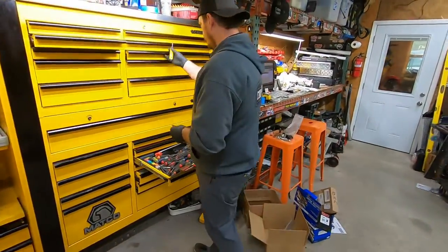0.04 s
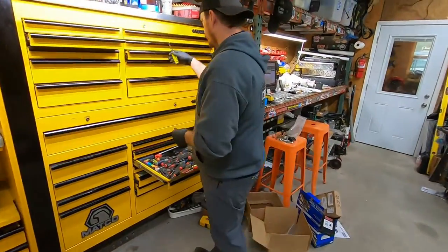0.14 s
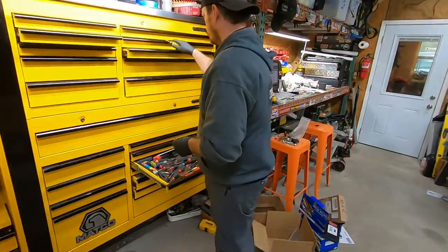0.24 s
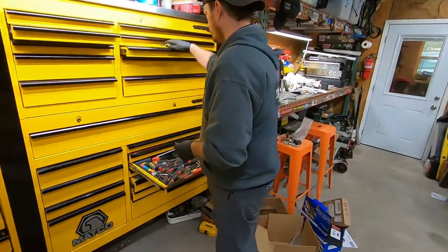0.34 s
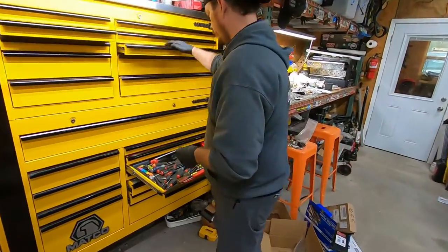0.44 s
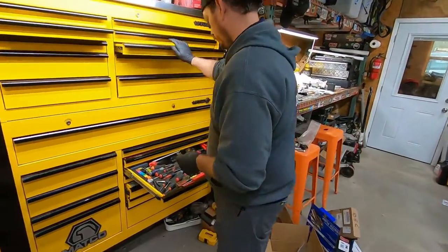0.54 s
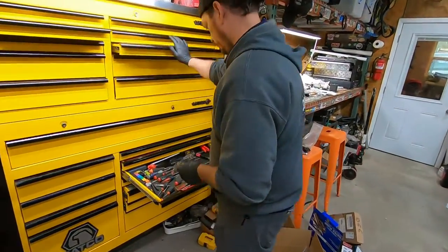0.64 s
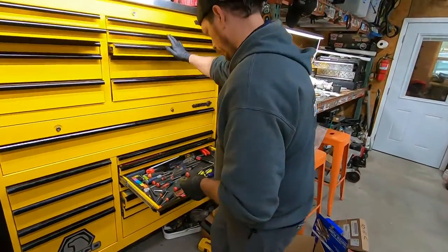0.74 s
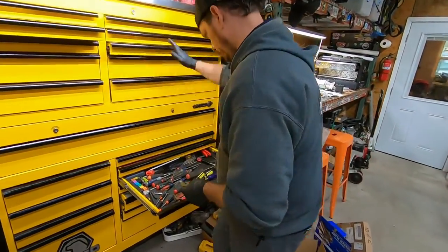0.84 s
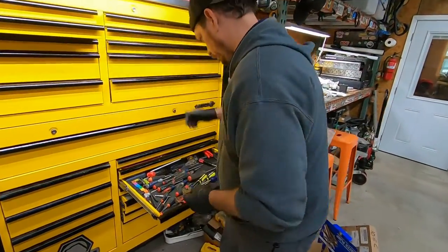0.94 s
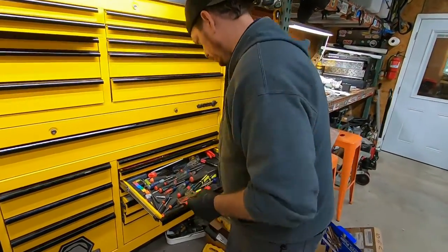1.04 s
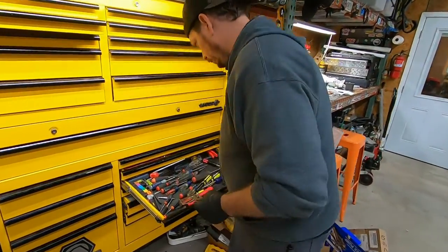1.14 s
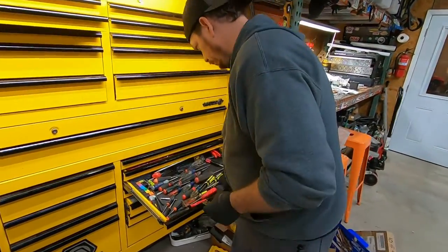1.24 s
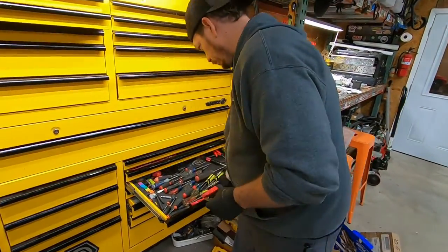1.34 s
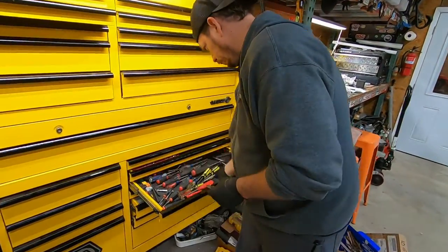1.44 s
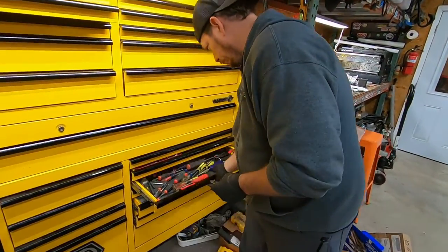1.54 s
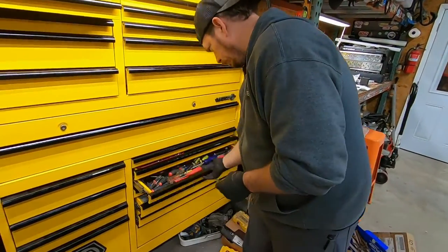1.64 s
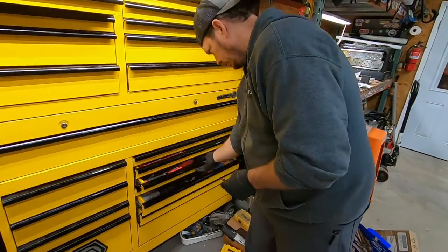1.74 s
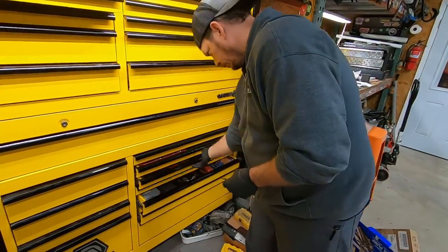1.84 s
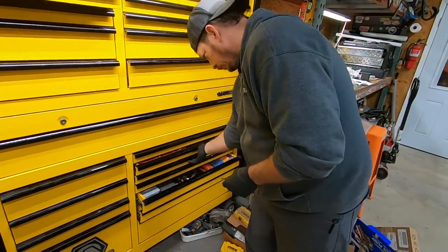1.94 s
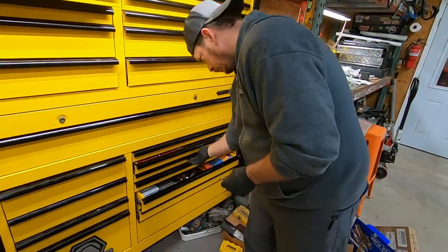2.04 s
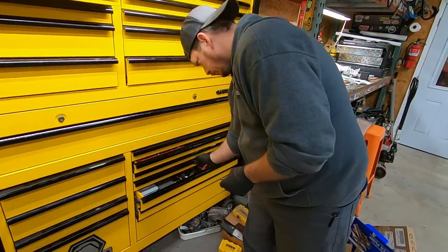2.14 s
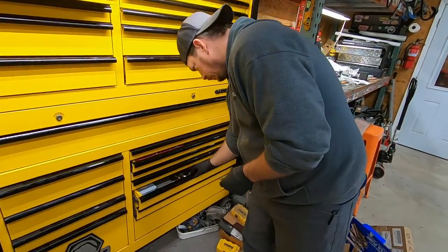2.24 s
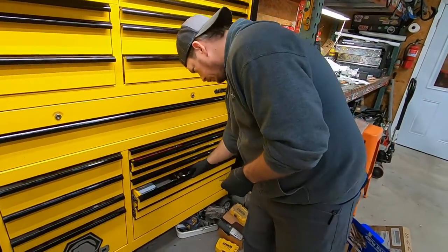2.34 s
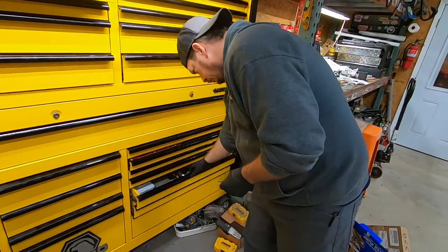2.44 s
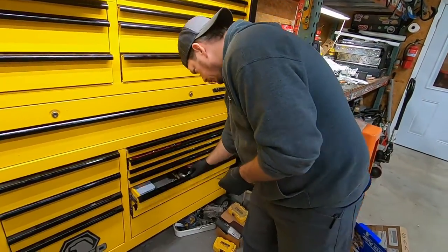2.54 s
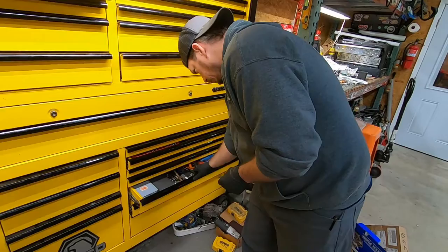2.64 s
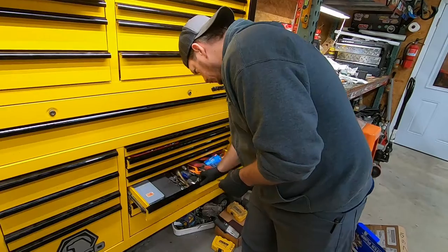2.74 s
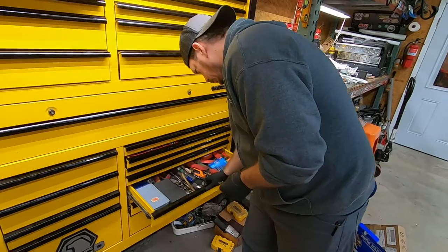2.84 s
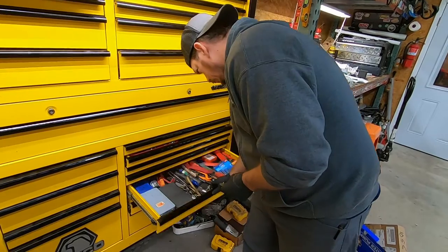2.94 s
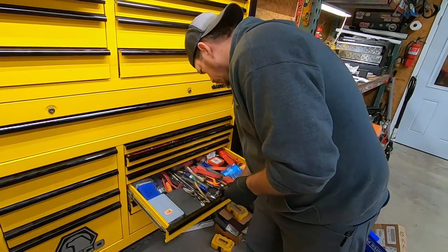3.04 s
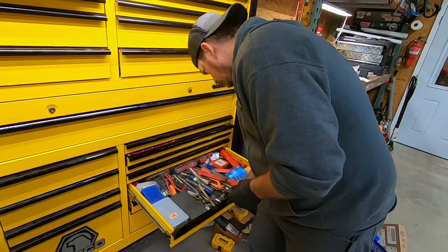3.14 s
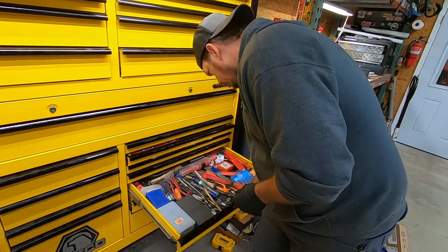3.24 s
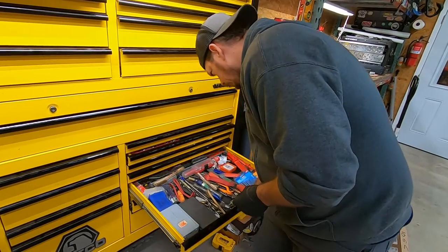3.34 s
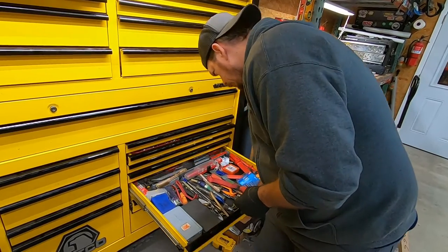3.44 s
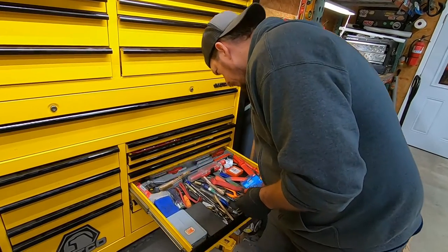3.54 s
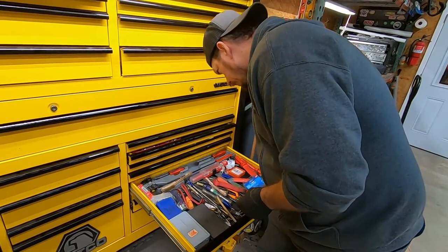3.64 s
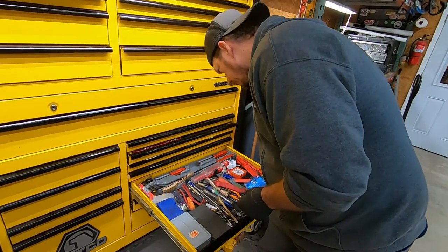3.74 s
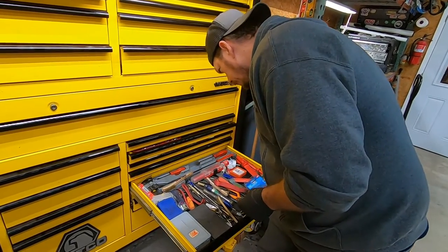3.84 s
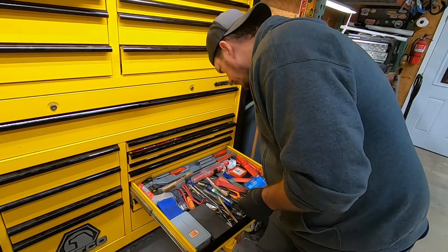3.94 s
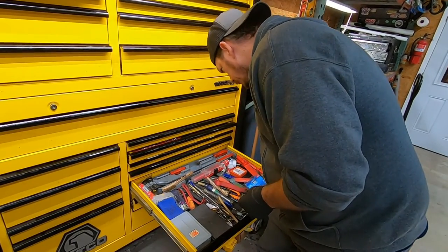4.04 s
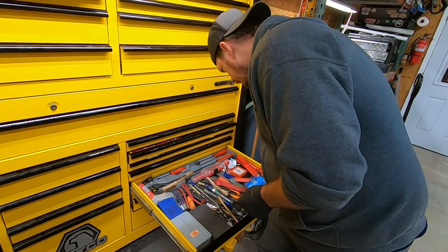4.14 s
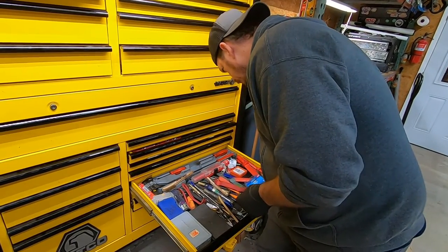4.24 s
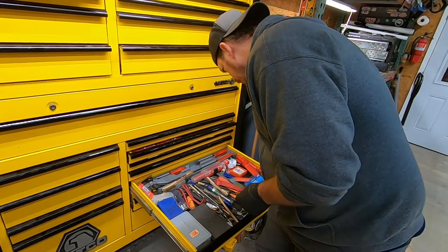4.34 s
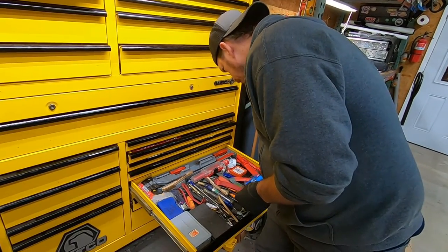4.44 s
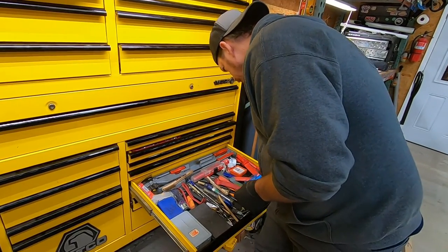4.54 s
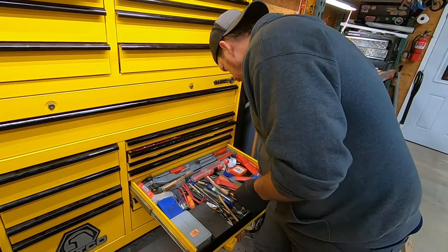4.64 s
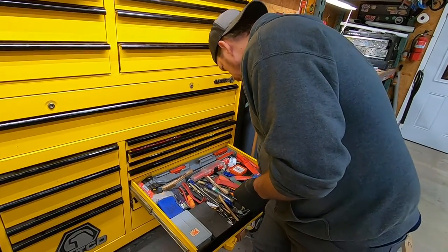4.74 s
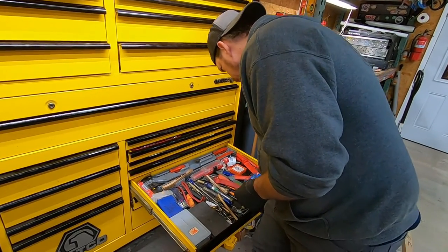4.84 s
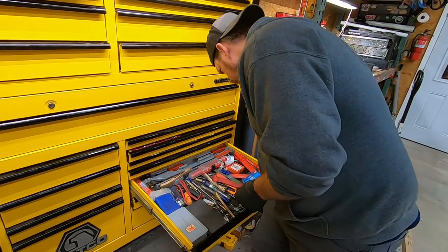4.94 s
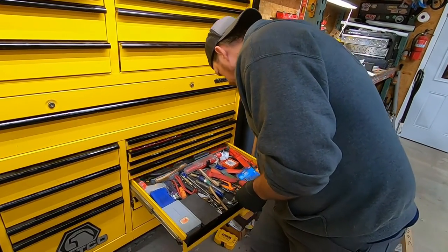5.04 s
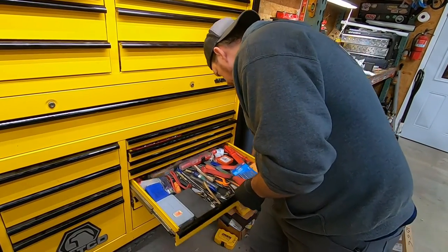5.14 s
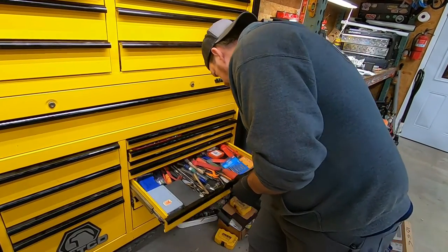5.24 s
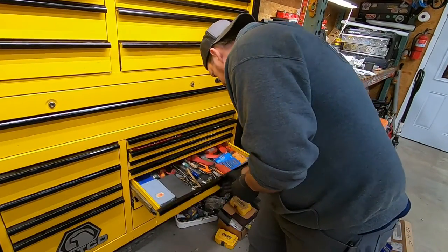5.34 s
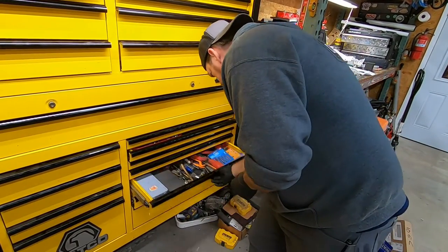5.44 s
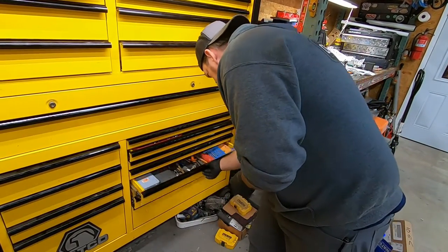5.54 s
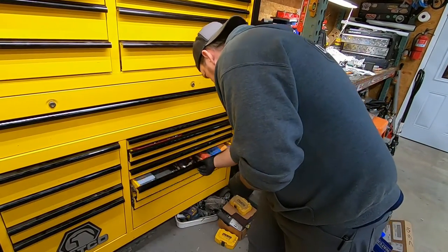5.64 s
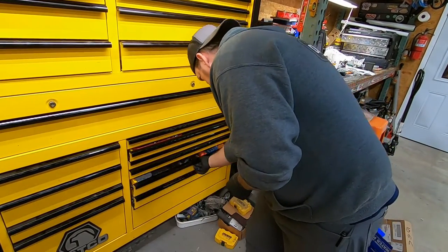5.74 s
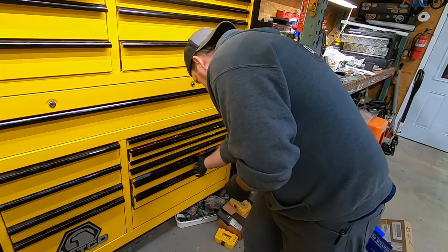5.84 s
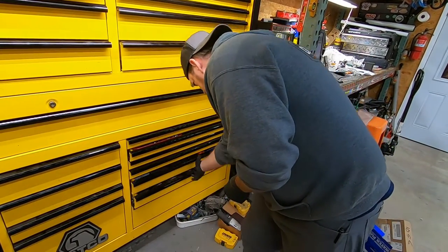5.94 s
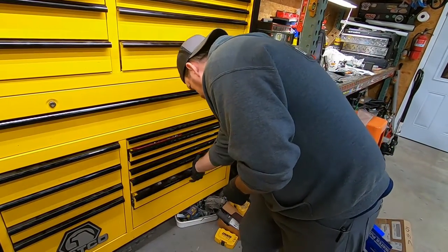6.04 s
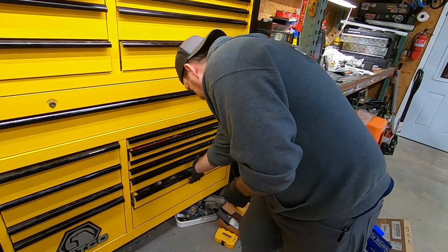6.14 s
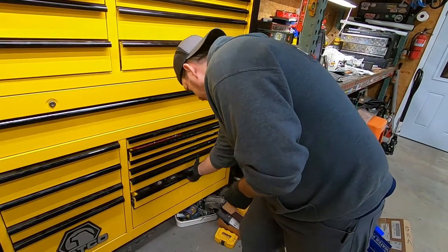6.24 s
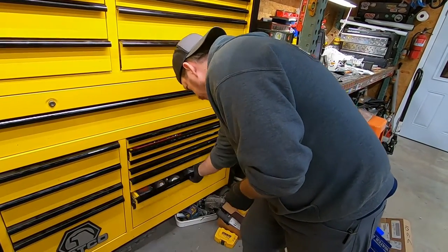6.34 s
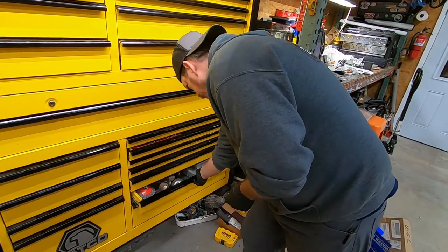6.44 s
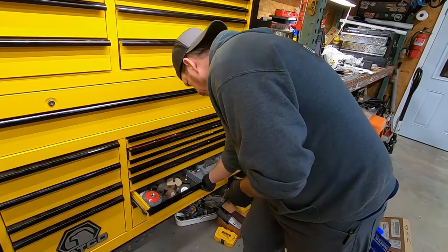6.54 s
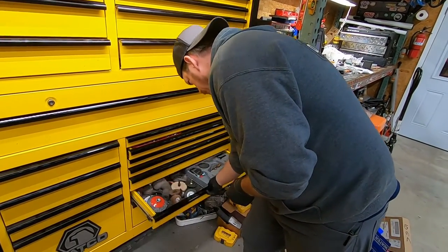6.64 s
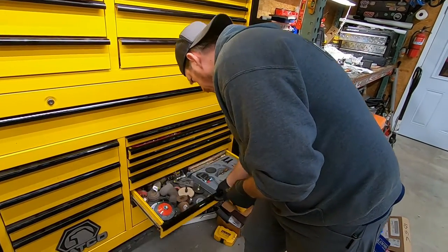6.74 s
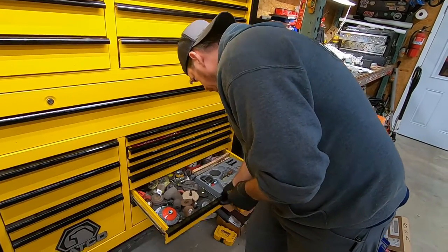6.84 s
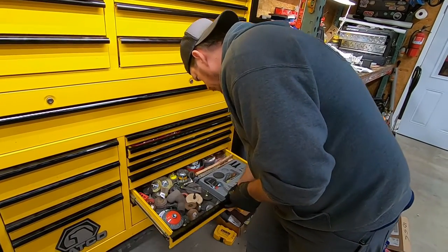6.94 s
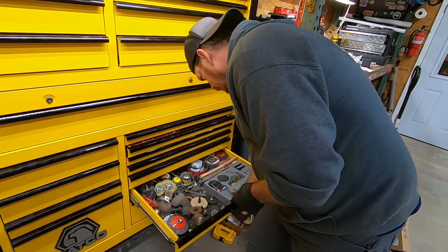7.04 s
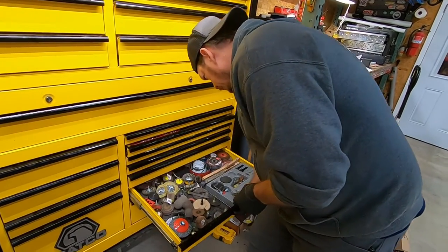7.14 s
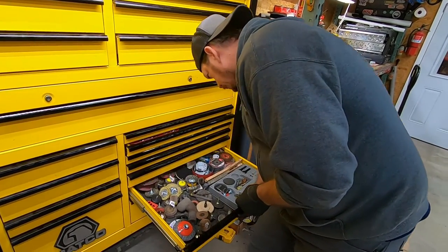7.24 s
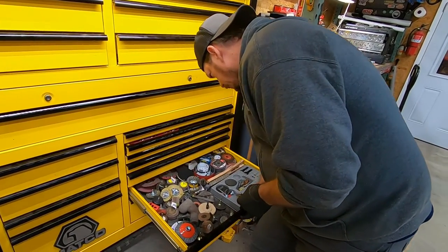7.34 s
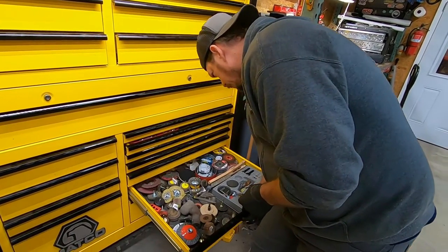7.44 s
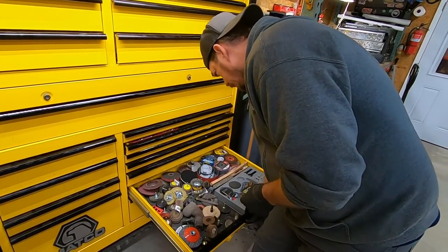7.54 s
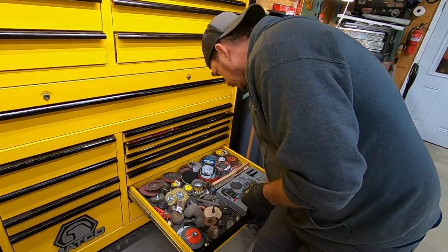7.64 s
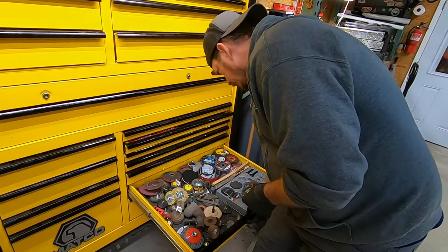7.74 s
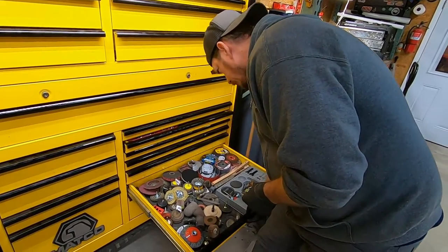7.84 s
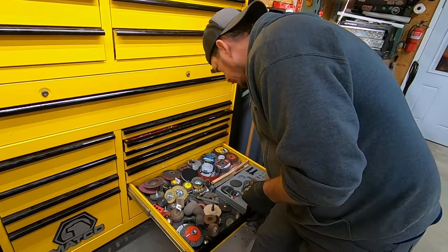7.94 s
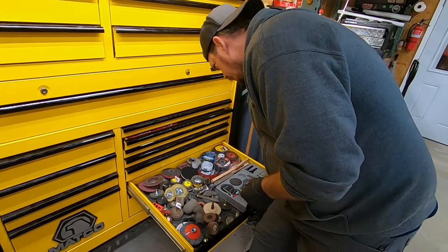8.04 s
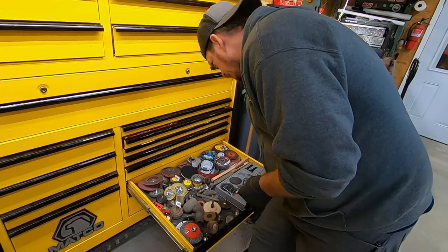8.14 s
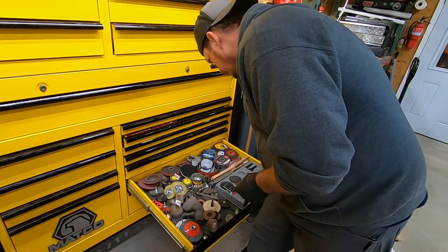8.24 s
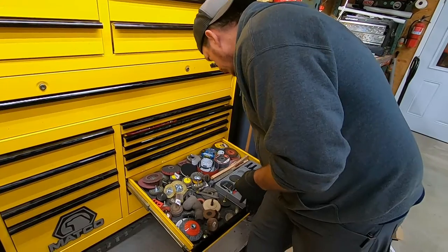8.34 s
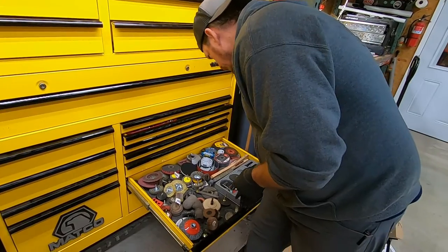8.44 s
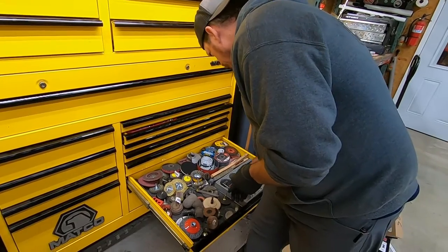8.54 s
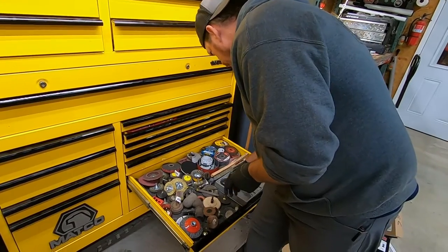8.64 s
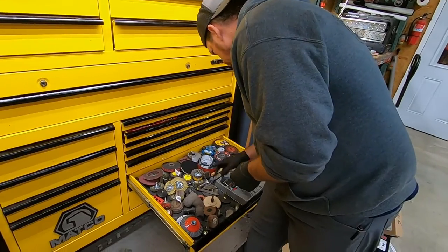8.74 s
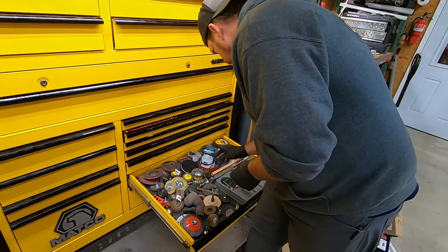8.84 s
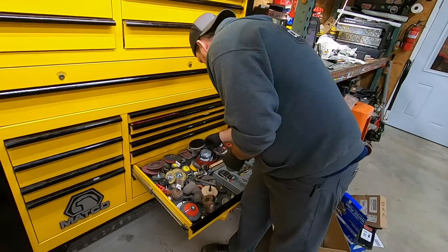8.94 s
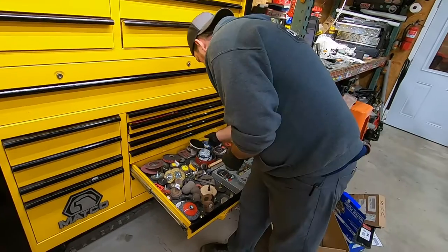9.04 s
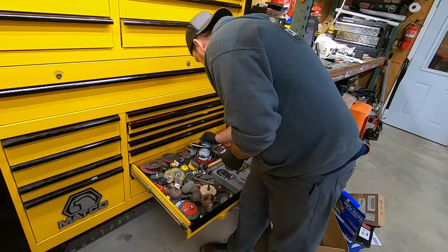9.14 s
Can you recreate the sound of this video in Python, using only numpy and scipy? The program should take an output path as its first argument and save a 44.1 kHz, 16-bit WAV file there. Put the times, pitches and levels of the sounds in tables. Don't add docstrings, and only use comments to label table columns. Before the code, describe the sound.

Close metallic drawer clunks and tool rattles in a workshop: slides scrape, the cabinet booms, loose parts tick, a low hum lies underneath.

```python
import sys
import numpy as np
from scipy import signal
from scipy.fft import rfft, irfft, next_fast_len
from scipy.io import wavfile

SR = 44100
rng = np.random.default_rng(int(sys.argv[2]) if len(sys.argv) > 2 else 0)


def generate_wav(signal):
    frames = np.transpose(np.atleast_2d(signal))
    scaled = np.clip(frames, -1, 1) * 32767
    pcm = np.round(scaled).astype(np.int16)
    wavfile.write(sys.argv[1], SR, pcm)


def volts(x):
    e = np.asarray(x, float) / 20
    return 10 ** e


N = 405279

RING_T60_S = [.044, .084, .168, .375]


def at_hz(points, hz):
    points = np.array(points)
    return np.interp(np.log(hz), np.log(points[:, 0]), points[:, 1])


def across(hz, centres, values):
    place = np.interp(np.log(hz), np.log(centres), np.arange(len(centres)))
    return sum(max(0, 1 - abs(place - k)) * v for k, v in enumerate(values))


def drift(rate):
    step = 40
    r = np.exp(-2 * np.pi * rate * step / SR)
    slow = signal.lfilter([1], [1, -2 * r, r * r], rng.standard_normal(N // step + 2002))[2000:]
    return np.interp(np.arange(N) / step, np.arange(len(slow)), slow / slow.std())


def ring(force, hz, t60):
    r, w = volts(-60 / (t60 * SR)), 2 * np.pi * hz / SR
    return signal.lfilter([0, np.sin(w)], [1, -2 * r * np.cos(w), r * r], force + 1e-18)


def add(track, s, part):
    i = round(s * SR)
    track[i:i + len(part)] += part[:len(track) - i]


def bands(strength, size, grain_db):
    edges = 28 * 2 ** np.arange(0, 9.3, .4)
    # [f/Hz, likeness]
    likeness = [(60, 0.93), (300, 0.97), (500, 0.81), (1000, 0.41), (2000, 0.48), (4000, 0.72), (8000, 0.4),
                (14000, 0.16)]
    # [f/Hz, level/dB]
    port_lean = [(60, -1), (150, -0.5), (450, 0), (950, 0.5), (2380, 0), (8000, -2), (13000, -4)]
    white = rng.standard_normal((2, 2, size))
    white *= volts(grain_db * np.minimum(rng.exponential(1, size), 5))
    white /= white.std()
    out = 0
    for k, (low, high) in enumerate(zip(edges, edges[1:])):
        hz = np.sqrt(low * high)
        band = signal.butter(2, [low, high], "band", fs=SR, output="sos")
        mid, side = signal.sosfilt(band, white[k % 2] * strength(hz) + 1e-18)
        alike = np.clip(at_hz(likeness, hz), 0, 1)
        ports = np.sqrt(1 + alike) * mid + np.sqrt(1 - alike) * side * [[1], [-1]]
        out = out + ports * volts(at_hz(port_lean, hz) * np.array([[.5], [-.5]]))
    return out


def hum():
    # [f/Hz, level/dB per Hz]
    hum_colour = [(20, -5.5), (45, 2.5), (100, -6), (190, 1), (400, -21), (750, -14), (2500, -26),
                  (15500, -34)]
    flutter = [drift(12) for k in range(5)]

    def strength(hz):
        depth_db = 4.2 * min(1, 200 / hz) ** .6
        return volts(at_hz(hum_colour, hz) + depth_db * flutter[int(hz) % 5])
    out = bands(strength, size=N, grain_db=2.0)
    return volts(-62.5) * out / out.std()


def shop(x):
    # [f/Hz, t60/s]
    room_decay = [(100, 0.59), (1000, 0.42), (5000, 0.39), (12000, 0.5)]
    t = np.arange(SR) / SR

    def strength(hz):
        return volts(-60 * t / at_hz(room_decay, hz)) * np.clip(t / 0.005, 0, 1)
    echo = bands(strength, size=SR, grain_db=0.0)
    echo = echo / np.sqrt(np.sum(echo ** 2) / 2)
    return signal.fftconvolve(x[None], echo, axes=1)[:, :N]


def in_time(rows, sound):
    *colour_db, swell, fade = sound
    t = np.arange(0, N + 64, 64) / SR
    effort = 0
    for s, end, first_db, last_db in rows:
        times = [s - 1, s, max(end, s + .01), end + 1]
        effort = effort + volts(np.interp(t, times, [first_db - swell, first_db, last_db, last_db - fade])) ** 2
    return effort * volts(np.array(colour_db)[:, None]) ** 2


def movement_db():
    # [start t/s, end t/s, first level/dB, last level/dB]
    travel = [
        (1.45, 1.74, -45, -45.5),
        (2.1, 2.3, -61.5, -53),
        (2.58, 3.1, -58.5, -49),
        (3.3, 3.9, -60, -71.5),
        (5.05, 5.45, -54, -42),
        (5.55, 5.75, -58.5, -60),
        (6.47, 6.95, -59, -45.5),
        (7.2, 8.8, -81.5, -71.5),
    ]
    # [start t/s, end t/s, first level/dB, last level/dB]
    shudder = [
        (0, .85, -56, -50),
        (1.2, 1.5, -36.5, -52),
        (1.9, 2.35, -47, -45.5),
        (3.0, 3.7, -37.5, -57),
        (5.6, 5.75, -44, -46),
        (6.0, 6.3, -55.5, -78),
        (6.6, 7.0, -43, -42),
        (7.1, 8.0, -45.5, -62.5),
        (8.8, 9.19, -61.5, -44.5),
    ]
    # [start t/s, end t/s, first
    # level/dB, last level/dB]
    rubs = [
        (0, .28, -42, -54.5),
        (.45, .66, -47.5, -44.5),
        (1.0, 1.08, -58, -38.5),
        (1.9, 2.2, -56.5, -48.5),
        (3.6, 3.9, -69.5, -59.5),
        (5.0, 5.15, -59.5, -59.5),
        (5.5, 5.56, -49.5, -63),
        (3.9, 6.4, -71.5, -66.5),
        (7.2, 8.85, -68.5, -67.5),
    ]
    # [rumble level/dB, tray level/dB, hiss level/dB, swell/(dB/s), fade/(dB/s)]
    travel_sound = (-0.5, -2, -5, 96.5, 112)
    shudder_sound = (-3, -18, -33, 74.5, 71)
    rub_sound = (-38, -31.5, -0.5, 109.5, 101)
    rest_db = [
        [-77],
        [-76.5],
        [-89],
    ]
    power = volts(rest_db) ** 2 + in_time(travel, travel_sound)
    power = power + in_time(shudder, shudder_sound) + in_time(rubs, rub_sound)
    return [np.interp(np.arange(N) / 64, np.arange(len(p)), 10 * np.log10(p)) for p in power]


def grit(level_db, per_s):
    ticking = volts(6.6 * np.minimum(rng.exponential(1, N), 4)) * (rng.random(N) < per_s / SR)
    pitches = np.geomspace(600, 6000, 18)
    dealt = rng.integers(0, 18, N)
    ports = []
    for port in (0, 1):
        ports.append(sum(ring(ticking * (dealt == k), pitches[k], 45 / pitches[k]) for k in range(port, 18, 2)))
    out = np.array(ports)
    out = out + 0.15 * out[::-1]
    return volts(level_db) * out / out.std()


def rolling():
    # [f/Hz, level/dB per Hz]
    slide_colour = [(24, -28), (45, -16), (180, -2.5), (450, -1.5), (750, 0), (2600, -15), (9000, -28),
                    (15500, -45)]
    # [f/Hz, width/Hz, level/dB]
    tray_modes = [(179.5, 44, 8.5), (321, 11, 3), (640, 68, -2.5), (710, 31, -8.5), (1250, 250, -2.5),
                  (2000, 25, -14.5), (3300, 330, -4.5)]
    rumble_db, tray_db, hiss_db = movement_db()
    shake, flutter = drift(29), [drift(26) for k in range(5)]

    def strength(hz):
        level_db = across(hz, [200, 900, 4500], [rumble_db + 10, tray_db + 8.5, hiss_db + 17.5])
        return volts(level_db + at_hz(slide_colour, hz) + 0.79 * shake + 1.7 * flutter[int(hz) % 5])
    scrape = bands(strength, size=N, grain_db=3.0)
    hollow = 0
    for hz, width, gain_db in tray_modes:
        hollow = hollow + volts(gain_db) * signal.lfilter(*signal.iirpeak(hz, hz / width, SR), scrape)
    return 1.023 * scrape + hollow + grit((tray_db + hiss_db) / 2 - 10, per_s=830.0)


def squeaks():
    # [t/s, length/s, first f/Hz, last f/Hz, level/dB]
    squeals = [
        (.93, .076, 3280, 3300, -66),
        (2.285, .24, 3230, 3030, -67),
        (3.645, .14, 3290, 3090, -67),
        (5.19, .13, 3770, 3720, -59),
        (3.5, .27, 7600, 6600, -72),
    ]
    out, waver, wobble = np.zeros(N), drift(40), drift(260)
    for s, length, first_hz, last_hz, level_db in squeals:
        part = np.linspace(0, 1, int(length * SR))
        wobble_hz = 45 * (first_hz / 3300) ** 2.6 * wobble[int(s * SR):][:len(part)]
        hz = first_hz + (last_hz - first_hz) * part + wobble_hz
        tone = np.sin(2 * np.pi * np.cumsum(hz) / SR)
        add(out, s, volts(level_db) * np.sin(np.pi * part) ** .5 * tone)
    return out * volts(2.6 * waver)


def ringing_parts():
    # [t/s, f/Hz, level/dB]
    in_hand = [(.0362, 8905, -51.2), (.1262, 4505, -44), (.4953, 3895, -26.7), (2.0562, 3755, -45),
               (2.7682, 731, -50.2), (5.1182, 5655, -47), (5.7902, 10905, -50), (5.9522, 3455, -57.2),
               (6.5234, 3395, -39.2)]
    # [t/s, f/Hz, level/dB]
    on_mat = [(.4305, 4410, -44), (.4951, 5985, -34.2), (1.7412, 7145, -36.2), (1.7452, 1945, -32),
              (3.0915, 7155, -37.7), (3.0932, 1303, -35.2), (6.4372, 4555, -58), (6.5232, 1274, -41.2),
              (7.0102, 4250, -53), (7.0652, 4610, -57), (7.0682, 905, -47.2), (8.0992, 3005, -58.2),
              (8.1002, 3705, -60.2), (9.1352, 2655, -40.2), (9.1422, 852, -39)]
    # [t/s, f/Hz, level/dB]
    on_steel = [(.4962, 3125, -40.2), (1.7402, 551, -34.5), (2.0542, 4705, -46.2), (3.9192, 6725, -69.2),
                (5.4542, 6795, -40.2), (6.9052, 1254, -58), (7.7772, 4605, -55.2), (7.7782, 835, -48.7),
                (9.1354, 2085, -44.2)]
    # [t/s, f/Hz, level/dB]
    free = [
        (.4972, 3245, -46.7),
        (.5192, 7032, -42.2),
        (9.1356, 681, -43),
        (9.1358, 3145, -56),
    ]
    kinds = zip([in_hand, on_mat, on_steel, free], RING_T60_S)
    return [(*row, t60) for kind, t60 in kinds for row in kind]


def rings():
    out, t, settle = np.zeros((2, N)), np.arange(SR // 2) / SR, drift(41)
    for s, hz, level_db, t60 in ringing_parts():
        apart_hz = rng.uniform(-0.037, 0.022) * hz * (RING_T60_S[0] / t60)
        pair = np.sin(2 * np.pi * hz * t) + 1.4 * np.sin(2 * np.pi * (hz + apart_hz) * t)
        lean_db = np.log2(1500 / hz)
        for port, side in zip(out, (.5, -.5)):
            add(port, s, volts(level_db + side * lean_db - 60 * t / t60) * pair * np.clip(t / 0.0016, 0, 1))
    return out * volts(2.8 * settle)


def clacks():
    # [t/s, f/Hz, level/dB, t60/s]
    struck_parts = [(0.139, 4430, -46, .15), (0.011, 388, -50, 0.15), (0.038, 2570, -38, .03),
                    (.1, 3300, -46, 0.072), (0.376, 408, -49.5, 0.043), (.698, 600, -48, 0.23),
                    (0.689, 4430, -37, 0.036), (.689, 5600, -46, .04), (.735, 5720, -38.5, 0.038),
                    (.736, 6200, -52, 0.044), (.766, 4950, -37.5, 0.026), (0.795, 4070, -41, 0.026),
                    (.81, 6970, -57, 0.23), (.879, 1410, -54.5, 0.1), (1.071, 301, -16, 0.036),
                    (1.074, 519, -25.5, 0.15), (1.1, 581, -28, 0.15), (1.511, 2626, -33.5, 0.04),
                    (1.612, 840, -38, 0.12), (1.746, 619, -29.5, 0.11), (1.83, 1640, -30, .05),
                    (1.834, 2020, -26.5, 0.025), (1.874, 2060, -33, 0.063), (2.055, 3300, -35.5, 0.026),
                    (2.19, 278.7, -36, 0.29), (2.2, 1504, -40, 0.096), (2.694, 740, -44.5, 0.055),
                    (2.709, 688, -38.5, 0.066), (2.882, 674, -42.5, 0.082), (2.893, 900, -47, .04),
                    (2.9506, 954, -32.5, 0.034), (3.163, 1380, -35.5, 0.032), (3.915, 704, -46.5, 0.058),
                    (5.431, 314, -13, 0.066), (5.585, 108, -32.5, 0.19), (5.584, 1073, -38.5, 0.14),
                    (5.79, 13450, -48, 0.032), (6.437, 3470, -57, 0.058), (6.778, 1250, -36.5, 0.039),
                    (6.875, 1220, -32, .03), (6.888, 1180, -34, 0.047), (7.008, 3380, -56, .07),
                    (7.009, 8100, -47.5, .05), (7.018, 1900, -64, 0.063), (7.778, 1565, -39.5, 0.05),
                    (7.778, 2610, -38.5, 0.034), (7.779, 7360, -47, .04), (7.824, 2460, -47, 0.053),
                    (7.836, 1550, -44.5, 0.076), (9.1355, 827, -14.5, 0.016), (9.136, 6560, -34.5, .05),
                    (9.152, 2890, -47, .2)]
    out, t = np.zeros((2, N)), np.arange(SR // 4) / SR
    for s, hz, level_db, t60 in struck_parts:
        shape = volts(level_db - 60 * t / t60) * (1 - np.exp(-t * hz / 0.8))
        main = np.sin(2 * np.pi * hz * t)
        neighbour = .6 * np.sin(2 * np.pi * 1.04 * hz * t)
        add(out[0], s, shape * (main + neighbour))
        add(out[1], s, shape * (main + neighbour * np.clip(1 - hz / 5000, -1, 1)))
    return out


def ticks():
    # [t/s, level/dB, f/Hz]
    latch_ticks = [(.0043, -36.5, 4521), (.0351, -34.5, 3601), (.0423, -27.5, 4571), (.0494, -32.5, 6801),
                   (.0565, -30.5, 3211), (.0639, -32.5, 6601), (.0704, -37.5, 7401), (.0892, -27.5, 9191),
                   (.1021, -32.5, 4161), (.1107, -27.5, 9301), (.1242, -31.5, 4091), (.131, -25.5, 4481),
                   (.1389, -32.5, 4301), (.1424, -32.5, 2401), (.1716, -33.5, 4181), (.18, -37.5, 4371),
                   (.1981, -38.5, 4091), (.217, -36.5, 7711), (.2219, -31.5, 3981), (.2666, -29.5, 3961),
                   (.2714, -37.5, 4401), (.3262, -50.5, 9001), (.4167, -50.5, 3211), (.4316, -34.5, 4411),
                   (.4951, -19.5, 3801), (.4954, -23.5, 6601), (.5159, -28.5, 7201), (.6769, -42.5, 4801),
                   (.6933, -34.5, 4411), (.75, -42.5, 2001), (.7671, -30.5, 5751)]
    # [t/s, level/dB, f/Hz]
    tool_ticks = [(1.0275, -38, 2700), (1.0765, -31, 2000), (1.192, -44, 1790), (1.3444, -44, 7230),
                  (1.4114, -43, 2970), (1.4521, -38, 2430), (1.4607, -37, 3620), (1.4718, -36.5, 2630),
                  (1.4783, -42.5, 3210), (1.5209, -35.5, 3120), (1.5353, -43, 2240), (1.5487, -30.5, 4500),
                  (1.5627, -30.5, 3560), (1.5962, -34, 2180), (1.6868, -30.5, 2000), (1.9487, -36, 3900),
                  (1.994, -44.5, 2970), (2.0556, -52, 4100), (2.11, -43, 2580), (2.2232, -42, 2780),
                  (2.6104, -57, 3340), (2.6668, -46, 3140), (2.9706, -46, 2480), (2.9777, -32, 3200),
                  (3.023, -24, 6300), (3.0925, -25.5, 3200), (3.773, -50, 3600), (3.7913, -48, 3440),
                  (3.888, -49, 2500), (4.104, -53, 3370), (4.832, -54.5, 3900), (5.0178, -46, 2610),
                  (5.0333, -44.5, 2910), (5.12, -38.5, 2540), (5.3607, -49, 2370), (5.424, -32, 2550),
                  (5.626, -46.5, 2970), (5.968, -50, 3530), (6.477, -40, 3570), (6.512, -49, 2560),
                  (6.578, -51, 3530), (6.783, -32, 3200), (6.858, -40, 5500), (6.88, -34, 3050),
                  (6.9164, -26, 3700), (6.9564, -34, 2580), (7.239, -52, 2410), (7.7222, -48.5, 4300),
                  (7.784, -41, 3300), (7.8244, -31, 4900), (7.89, -51, 3320), (8.101, -48, 3670),
                  (9.1445, -32, 1810)]
    tool_lift_db, cycles = 3.5, 18
    out, t = np.zeros(N), np.arange(SR // 20) / SR
    for s, level_db, hz in latch_ticks + [(s, db + tool_lift_db, hz) for s, db, hz in tool_ticks]:
        tones = np.sin(2 * np.pi * hz * t) + volts(-11) * np.sin(2 * np.pi * 2.1 * hz * t)
        add(out, s, volts(level_db - 60 * t * hz / cycles) * tones * np.minimum(t * hz, 1))
    return out * volts([[.4], [-.4]])


def contacts():
    # [t/s, level/dB, hardness/dB, rattle t60/s]
    jingles = [(0.035, -35, -4.5, 0.15), (3.744, -58, -3, 0.05), (0.102, -41.5, -2.5, 0.61),
               (0.125, -37, -6, 0.08), (0.2146, -40, 0, 0.088), (0.266, -39.5, -2, 0.042),
               (0.431, -45.5, -1.5, 0.27), (0.555, -35, -4, 0.16), (0.7337, -37, -12, 0.06),
               (2.582, -40.5, -21, 0.44), (2.6179, -49, -13.5, 0.34), (2.9786, -32.5, -10.5, 0.09),
               (3.021, -27.5, -12, 0.065), (6.7773, -31.5, -9, 0.051), (7.8228, -33.5, -8, 0.056),
               (9.1606, -27, -22, 0.23)]
    # [t/s, level/dB, hardness/dB, rattle t60/s]
    taps = [(0.4947, -22.5, -2, 0.056), (0.5156, -30.5, -1, 0.12), (0.7645, -42, 0.5, 0.24),
            (0.794, -37.5, -13, 0.061), (0.879, -53, -3, 0.2), (1.0263, -32.5, -21, 0.15),
            (1.45, -38.5, -10, 0.11), (1.467, -30.5, -19, 0.045), (1.5478, -32, -10, 0.042),
            (1.5611, -28.5, -11, 0.058), (1.735, -20.5, -2.5, 0.12), (1.8274, -28.5, -1.5, 0.19),
            (1.874, -32, -11, 0.12), (2.0553, -28, -30, 0.024), (2.6577, -60, -9, 0.17),
            (1.5094, -36.5, -13, 0.11), (3.0931, -18.5, -7.5, 0.039), (3.79, -45, -14.5, 0.36),
            (3.8869, -45, -33.5, 0.12), (3.912, -48, -34, 0.3), (6.5198, -25.5, -22, 0.081),
            (7.0653, -29.5, -29, 0.061), (7.722, -49.5, -9.5, 0.93), (8.0974, -39.5, -13.5, 0.072),
            (9.1364, -15, -17, 0.044)]
    # [t/s, level/dB, hardness/dB, rattle t60/s]
    knocks = [(1.0754, -28, -17.5, 0.24), (1.0975, -41, -3, 0.43), (1.5936, -39.5, -10.5, 0.58),
              (1.6818, -27.5, -26, 0.21), (1.7369, -20, -20.5, 0.11), (2.1966, -44.5, -1, 0.15),
              (3.161, -30.5, -8, 0.099), (3.813, -45.5, -28, 0.24), (3.856, -48.5, -18, 0.14),
              (4.8289, -42, -26, 0.19), (5.4526, -26.5, 1, 0.17), (5.579, -24.5, -25, 0.14),
              (5.9564, -52.5, -7, 0.24), (6.4757, -40.5, -14.5, 0.15), (6.763, -39, -7, 0.22),
              (6.875, -27, -27, 0.1), (7.771, -38.5, -17, 0.22), (9.124, -37.5, -14, 0.16)]
    # [t/s, level/dB, hardness/dB, rattle t60/s]
    bumps = [(0.0024, -52.5, 14.5, 0.14), (0.687, -42, -10, 0.36), (1.0602, -30.5, -12, 0.38),
             (2.1148, -23.5, -17, 0.27), (5.017, -46.5, -5.5, 0.1), (5.1202, -39.5, -6.5, 0.08),
             (5.4201, -14, -4.5, 0.066), (5.7885, -53.5, -4.5, 0.14), (6.2602, -57.5, -4, 0.093),
             (6.4344, -51.5, -17, 0.44), (6.9168, -31.5, -4, 0.1), (6.953, -39.5, -5, 0.088),
             (7.007, -41.5, -9.5, 0.25), (7.8879, -46, -27, 0.13)]
    # [t/s, level/dB, hardness/dB, rattle t60/s]
    thuds = [
        (2.1583, -38.5, -8, 0.23),
        (2.699, -53, -18, 0.13),
        (2.88, -45, -43, 0.11),
        (2.951, -36, -21, 0.083),
        (5.6096, -63, -38.5, 0.1),
    ]
    # [low level/dB, body level/dB]
    weights = [
        (-29, -25),
        (-7, -12),
        (-8, -2.5),
        (-1, -10.5),
        (6, 8),
    ]
    hits = []
    for kind, (low_db, body_db) in zip([jingles, taps, knocks, bumps, thuds], weights):
        hits += [(s, db, db + low_db, db + body_db, db + hard_db, t60) for s, db, hard_db, t60 in kind]
    return hits


def hit_db(hit, hz):
    s, mid_db, low_db, body_db, high_db, t60 = hit
    levels_db = [low_db + 14.5, body_db + 10.0, mid_db - 0.5, high_db + 3.5]
    return across(hz, [330, 950, 2600, 6700], levels_db) - 8 * max(0, np.log2(hz / 7000))


def softness(hit):
    s, mid_db, low_db, body_db, high_db, t60 = hit
    return 2 ** np.clip((max(mid_db - 9, low_db) - high_db) / 4.5, 0, 3.1)


def clinks(count):
    out, t, hits = np.zeros((2, N)), np.arange(SR // 10) / SR, contacts()
    for hit, (pitch, size, life, side) in zip(hits, rng.random((len(hits), 4, count))):
        hz = 550 * 2 ** (4.1 * (np.arange(count) + pitch) / count)
        level_db = np.array([hit_db(hit, f) for f in hz])
        level_db = level_db - 21.5 + 14 * (size - .5) + 2 * np.log2(hz / 2000)
        t60 = .03 + .05 * life
        partials = volts(level_db[:, None] - 60 * t / t60[:, None]) * np.sin(2 * np.pi * hz[:, None] * t)
        partials = partials * (1 - np.exp(-t / (0.00038 * softness(hit))))
        lean = np.clip(hz / 4000, 0, 1) * 1.3 * (side - .6)
        add(out[0], hit[0], (1 + lean) @ partials)
        add(out[1], hit[0], (1 - lean) @ partials)
    return out


def rattles():
    bounce = volts(1.6 * drift(70))
    hits = contacts()

    def strength(hz):
        out, longer = np.zeros(N), (2600 / max(hz, 300)) ** 0.045
        for hit in hits if hz > 100 else []:
            s, mid_db, *_, rattle_t60 = hit
            t60 = np.clip(rattle_t60, .01, 1) * longer * 2 ** ((mid_db + 28) / 30)
            start = round(s * SR)
            t = (np.arange(int(t60 * SR)) / SR)[:N - start]
            chatter = volts(-60 * t / t60) * bounce[start:][:len(t)]
            crack = 1.2 * volts(-60 * t / 0.0053)
            rise = 1.6 / hz + 0.00065 * softness(hit)
            add(out, s, volts(hit_db(hit, hz)) * (chatter + crack) * (1 - np.exp(-t / rise)))
        return out * min(1, hz / 180) ** 2
    return bands(strength, size=N, grain_db=3.0)


def booms():
    # [t/s, push length/s]
    shoves = [(0.495, 0.0095), (.69, 0.02), (1.069, 0.03), (1.745, 0.035), (2.116, 0.015), (2.147, 0.026),
              (2.95, 0.023), (3.098, 0.016), (5.421, 0.018), (6.917, 0.015), (7.775, 0.013),
              (9.125, 0.0066), (2.482, .03)]
    # [f/Hz, level/dB, t60/s]
    panels = [
        [(109, -42.5, 0.42), (189, -34.5, 0.24), (210, -38, 0.28)],
        [(512, -40, 0.16)],
        [(40, -33.5, 0.77), (73.4, -18, 0.63), (115.4, -19, 0.7), (149.8, -22.5, 0.54), (200, -25, 0.37),
         (251, -31, 0.36), (474, -29.5, 0.3), (589, -36, 0.25)],
        [(82, -35.5, 0.66), (122, -33, 0.52), (157.8, -33.5, 0.43), (209, -36, 0.56), (315, -22, 0.11)],
        [(44, -31.5, 0.61), (153.6, -30.5, 0.56), (215, -21, 0.092), (331, -28.5, 0.23)],
        [(39.5, -35, 1.54), (73.1, -26, 0.85), (99.1, -26, 0.85), (149.6, -25.5, 0.5)],
        [(148, -43, 0.2)],
        [(77.5, -39.5, 0.44), (143.5, -44, 0.74), (204, -44, 0.59)],
        [(90, -35.5, 0.84), (206.4, -24.5, 0.35), (123, -22, 0.42), (334, -32.5, 0.18)],
        [(76, -46, 0.686), (109.5, -43, 0.73), (164.6, -36.5, 0.43), (193.5, -39, 0.43)],
        [(177, -45.5, 0.41)],
        [(211, -25.5, 0.069), (268.3, -42, 0.28), (385, -35, 0.15)],
        [(63, -41, 0.31)],
    ]
    out, t = np.zeros(N), np.arange(SR) / SR
    for (s, length), modes in zip(shoves, panels):
        push = np.sin(np.pi * np.clip(t / length, 0, 1)) ** 2
        for hz, level_db, t60 in modes:
            shove = push * np.sin(2 * np.pi * (hz * t + rng.random())) * 3.6 / (length * SR)
            apart_hz = rng.uniform(1.1, 11.0)
            group = ring(shove, hz, t60)
            group = group + 0.71 * ring(shove, hz + apart_hz, 1.1 * t60)
            group = group - 0.42 * ring(shove, hz - 1.7 * apart_hz, 0.9 * t60)
            add(out, s, volts(level_db) * group)
    out = signal.sosfilt(signal.butter(2, 36, "high", fs=SR, output="sos"), out)
    return out * volts([[.3], [-.3]])


def scene():
    struck = rattles() + clinks(count=36) + ticks() + clacks()
    ringing = rings()
    echo = shop((struck + volts(-4.5) * ringing).mean(axis=0))
    return struck + ringing + booms() + volts(-7) * echo + rolling() + squeaks() + hum()


def band_limit(x):
    return signal.sosfilt(signal.butter(12, 15820, fs=SR, output="sos"), x)


def record(dry):
    # [f/Hz, lead/rad]
    port_lead = [(0, 0), (7000, 0), (8600, 2), (15000, 6)]
    size = next_fast_len(N)
    hz = np.arange(size // 2 + 1) * SR / size
    turn = np.exp(1j * np.interp(hz, *np.transpose(port_lead)) * np.array([[.5], [-.5]]))
    top = np.clip((15750 - hz) / 500, 0, 1)
    dry = irfft(rfft(dry, size) * turn * top, size)[:, :N]
    for dip_hz, q, depth in [(456, 4.0, 0.5), (5300, 5.0, 0.16)]:
        dry = dry - depth * signal.lfilter(*signal.iirpeak(dip_hz, q, SR), dry)
    dull = signal.sosfilt(signal.butter(8, 9670, fs=SR, output="sos"), dry)
    heard = dull + volts(-18.5) * (dry - dull)
    ceiling = .55
    return band_limit(ceiling * np.tanh(heard / ceiling))


dry = scene()
out = record(dry)
generate_wav(out)
```